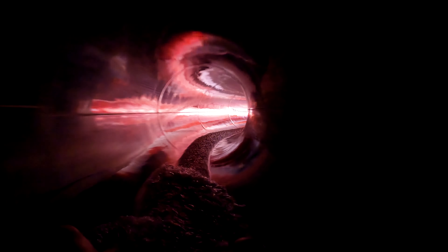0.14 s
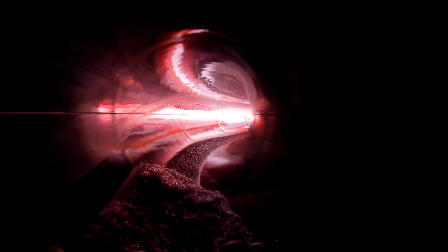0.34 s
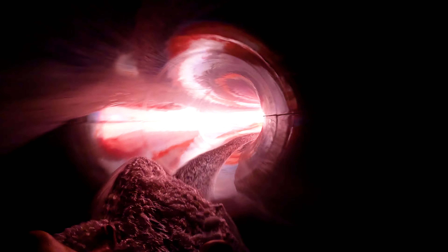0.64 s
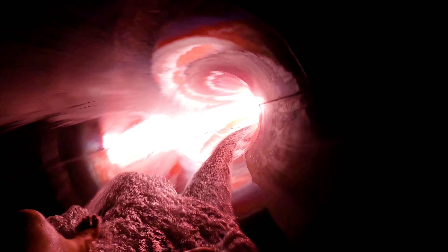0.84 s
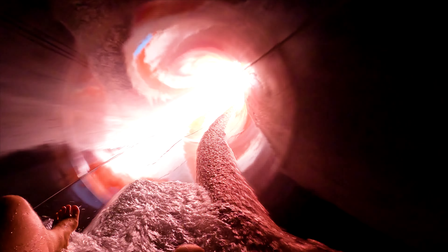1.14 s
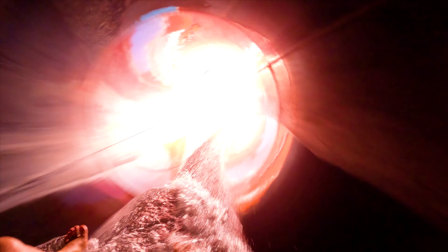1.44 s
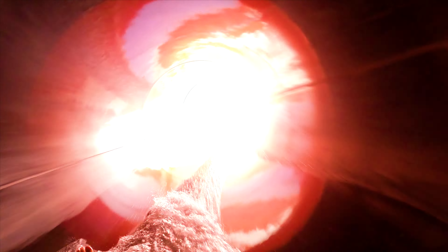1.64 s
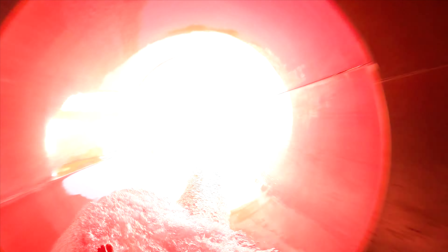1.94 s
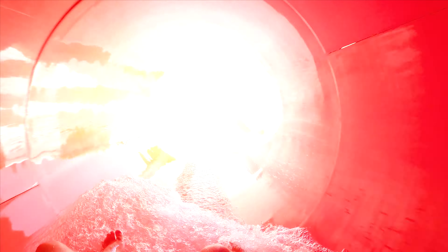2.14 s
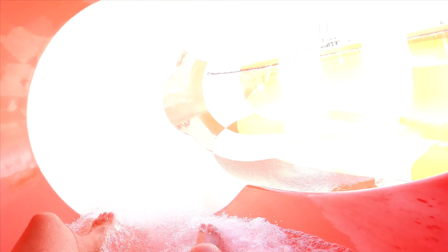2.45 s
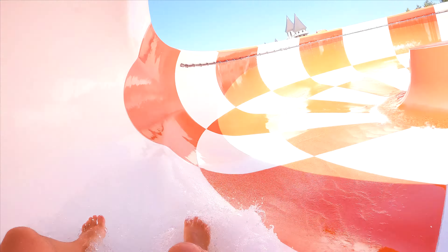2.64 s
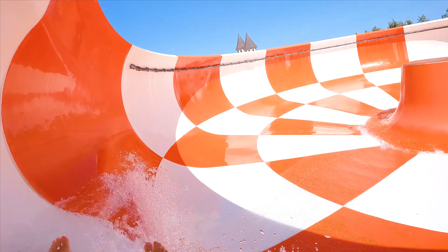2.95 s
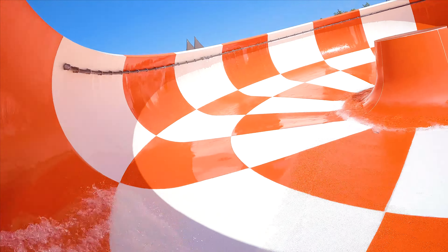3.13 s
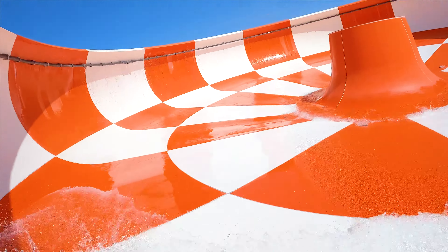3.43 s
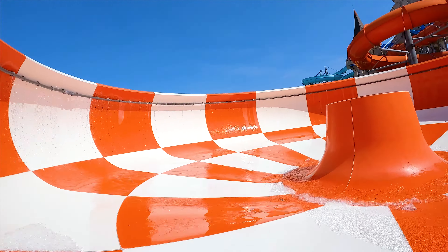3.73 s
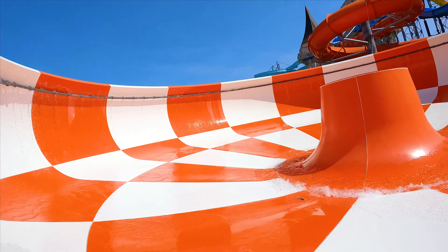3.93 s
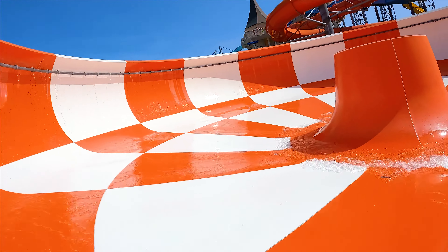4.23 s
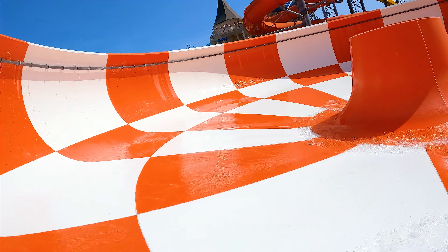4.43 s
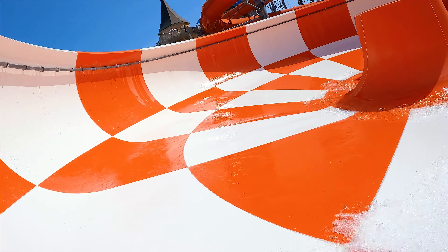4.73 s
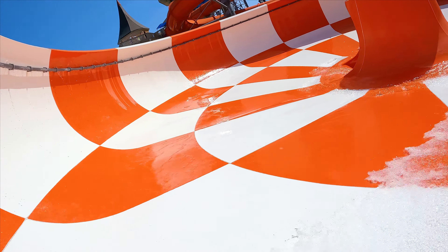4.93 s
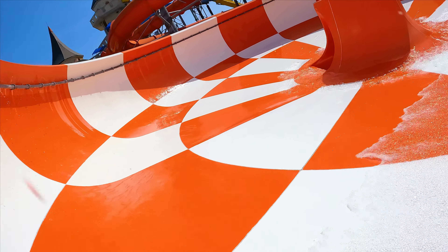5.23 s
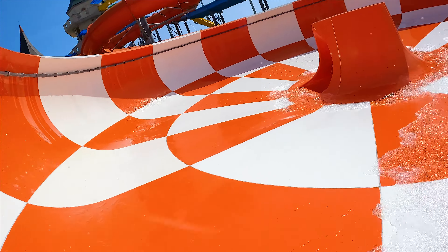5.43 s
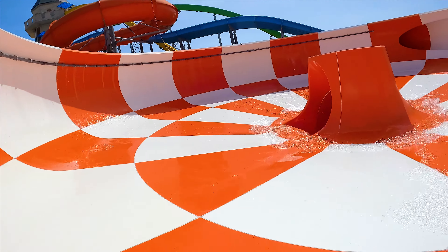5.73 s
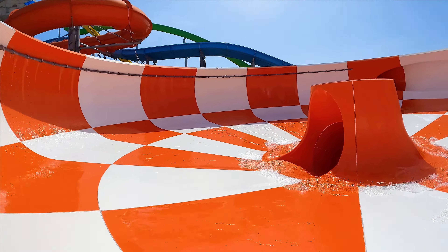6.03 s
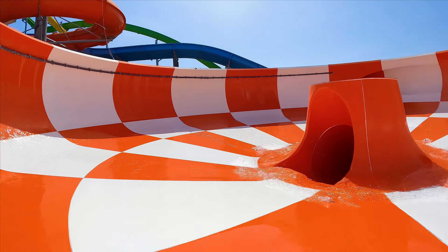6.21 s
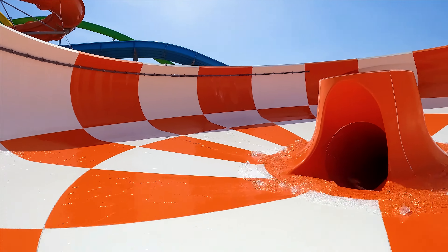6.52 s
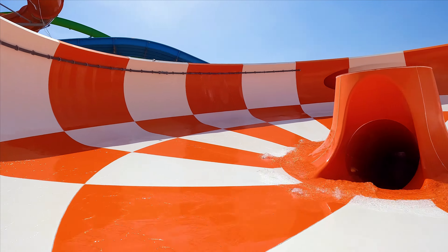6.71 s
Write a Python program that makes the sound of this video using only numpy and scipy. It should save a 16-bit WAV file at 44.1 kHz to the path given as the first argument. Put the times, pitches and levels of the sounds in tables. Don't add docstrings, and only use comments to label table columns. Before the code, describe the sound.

Close, muffled first-person sound of a water slide ride. Water roars steadily with a hollow, ringing hum in the tube, over deep wind buffeting, shuddering rumble and gulping air pockets. Around three seconds the space opens into an outdoor bowl; spray surges, the ringing fades and bumps grow harder. Later a faint high sizzle appears, and finally waves gurgle over the sealed microphone with quick slaps.

```python
import sys
import numpy as np
from scipy import signal
from scipy.fft import rfft, irfft, next_fast_len
from scipy.io import wavfile
from scipy.ndimage import uniform_filter1d, minimum_filter1d, map_coordinates

SR = 44100
rng = np.random.default_rng(int(sys.argv[2]) if len(sys.argv) > 2 else 0)


def inscribe(sig):
    pcm = np.round(np.clip(np.atleast_2d(sig).T, -1, 1) * 32767)
    wavfile.write(sys.argv[1], SR, pcm.astype(np.int16))


def undo_db(level):
    steps = np.asarray(level, float) / 20
    return 10 ** steps


N = 302967

# (frequency [Hz], density [dB per Hz])
CHURN_COLOUR = [(500, -60), (850, -6.5), (1050, -2.5), (1300, -8.5), (1700, -16), (2300, -27.5),
                (4500, -120)]
# (time [s], level [dB])
HULL_LOAD = [(0, -31), (.75, -31), (1.0, -31.5), (1.4, -29), (1.9, -36.5), (2.3, -30), (2.7, -26),
             (3.15, -26), (3.5, -25.5), (3.95, -29), (4.15, -25), (4.75, -27), (5.2, -31), (5.7, -24),
             (5.9, -25), (6.4, -27), (6.65, -19), (6.87, -21)]
RING_ATTACK_S, RING_T60_S = 0.02, 0.43


def unit(x):
    return x / np.sqrt(np.mean(x ** 2) + 1e-20)


def clock():
    return np.arange(N) / SR


def curve(rows):
    times, values = np.transpose(rows)
    return np.interp(clock(), times, values, left=-150, right=-150)


def wobble(rate):
    knots = rng.standard_normal(2000)
    return map_coordinates(knots, [np.arange(N) * rate / SR])


def swells(rows):
    t = clock()
    return sum(db * np.exp(-((t - s) / half) ** 2) for s, db, half in rows)


def spells(rows, attack_s, t60_s):
    t = clock()
    gain = np.zeros(N)
    for start, db, hold in rows:
        onset = np.clip((t - start) / attack_s + 0.5, 0, 1)
        decay_db = 60 * np.maximum(t - start - hold, 0) / t60_s
        gain += onset * undo_db(db - decay_db)
    return gain


def smoothed(x, size):
    return uniform_filter1d(uniform_filter1d(x, size=size), size=size)


def steadied(x, size, share):
    power = np.abs(smoothed(x ** 2, size))
    return unit(x / (power + 1e-3) ** share)


def filtered(x, response):
    m = next_fast_len(N + SR // 2)
    return irfft(rfft(x, m) * response(np.fft.rfftfreq(m, 1 / SR)), m)[:N]


def colour(points):
    f, v = np.transpose(points)
    return lambda hz: undo_db(np.interp(np.log(hz + 1), np.log(f + 1), v))


def resonance(f, hz, width):
    return f * width / (hz * hz - f * f + 1j * f * width)


def rush(response, patchy_db, spiky=0.0):
    drops = rng.standard_normal(N) * np.exp(spiky * rng.standard_normal(N))
    z = signal.stft(drops, nperseg=1024)[2]
    field = uniform_filter1d(rng.standard_normal(z.shape), size=8, axis=0)
    field = uniform_filter1d(field, size=6, axis=1)
    patchy = signal.istft(z * undo_db(patchy_db * unit(field)), nperseg=1024)[1][:N]
    return unit(filtered(patchy, response))


def knocks(events, gain_db, cycles, noisy):
    out = np.zeros(N + SR)
    t = np.arange(SR // 5) / SR
    for s, db, hz, t60 in events:
        puff = smoothed(rng.standard_normal(len(t)), int(SR / hz))
        shape = undo_db(-60 * t / t60) * (1 - np.exp(-t * hz / cycles)) ** 2
        ring = shape / shape.max() * np.sin(2 * np.pi * hz * t)
        out[round(s * SR):][:len(t)] += undo_db(db + gain_db) * (1 + noisy * unit(puff)) * ring
    return out[:N]


def opening():
    # (time [s], open share [0-1])
    open_share = [
        (0, 0.03),
        (2.2, 0.04),
        (2.9, 0.6),
        (3.6, 0.98),
        (6.87, 0.96),
    ]
    return np.clip(curve(open_share), 0, 1)


def flow():
    # (time [s], level [dB])
    flow_points = [(0, -24), (.25, -24), (.55, -24), (.95, -25), (1.3, -27), (1.7, -26.5), (2.05, -25),
                   (2.35, -23), (2.85, -21), (3.1, -20.5), (3.8, -26), (4.25, -26), (4.65, -21.5),
                   (5.2, -28.5), (5.6, -27.5), (6.0, -28.5), (6.4, -26.5), (6.87, -24.5)]
    db = curve(flow_points)
    return db, db - db.mean()


def waves():
    # (crest time [s], rise [dB], build-up [s])
    crests = [(.2, 3, 0.27), (.9, 1, 0.5), (1.53, 1.5, 0.075), (1.9, 3, 0.55), (2.42, 0, 0.074),
              (2.58, 1, 0.045), (3.15, -2.5, 0.3), (2.05, 0.5, .15), (3.18, 3.5, 0.034), (3.24, 3, 0.045),
              (3.3, 3, .06), (3.38, 7, 0.067), (3.44, 6, 0.053), (3.475, 0.5, .04), (3.63, 5.5, 0.034),
              (3.72, 1.5, 0.094), (4.13, -0.5, .05), (4.48, 1, 0.063), (4.75, -1.5, 0.11), (5.12, 0, .06),
              (5.67, -2, 0.14), (5.9, 2, .06), (6.2, 4, 0.3), (6.32, -0.5, 0.066)]
    t = clock()
    rise = np.zeros(N)
    for s, db, build in crests:
        span = np.where(t < s, build, 0.43 * build)
        rise += db * np.exp(-((t - s) / span) ** 2)
    return rise


def lurches():
    # (time [s], change [dB], half length [s])
    digs = [(.3, 0, .1), (0.616, 2, 0.043), (0.952, -9.5, 0.15), (1.2, 1, 0.056), (1.397, 3.5, 0.037),
            (1.576, -3, 0.056), (1.949, 7.5, 0.25), (2.2, 6, 0.049), (2.45, 1, 0.046), (3.005, -3, 0.053),
            (3.17, 1.5, 0.057), (3.563, 3.5, 0.16), (3.72, -1.5, 0.044), (3.87, 6, 0.039),
            (4.146, 7.5, 0.018), (4.31, -5.5, 0.023), (4.398, 6.5, 0.045), (4.603, -2.5, 0.04),
            (4.99, 1.5, 0.073), (5.197, -4.5, 0.024), (5.39, 5, 0.05), (5.62, -4, 0.025), (5.69, 1, 0.025),
            (5.93, 5, 0.028), (6.246, 1, 0.12), (6.6, 5, 0.031), (6.74, 1, 0.037), (6.86, -3.5, 0.029)]
    return swells(digs)


def port_film():
    # (time [s], level [dB])
    spread = [
        (4.0, -115),
        (4.08, -91),
        (4.35, -77.5),
        (4.7, -75.5),
        (4.9, -82.5),
        (5.1, -82),
        (5.3, -82),
        (5.42, -76),
        (5.85, -75),
        (6.22, -68),
    ]
    # (frequency [Hz], density [dB per Hz])
    port_colour = [(8000, -70.5), (11200, -40), (11800, -6.5), (12800, 0), (13600, -3), (14500, -14),
                   (15700, -13), (17000, -80.5)]
    t = clock()
    end_s, end_db = spread[-1]
    film_db = np.where(t < end_s, curve(spread), end_db)
    film_db = film_db - 85 * np.maximum(t - 6.5, 0)
    film_db = film_db - 900 * np.maximum(t - 6.63, 0)
    return undo_db(film_db + 1.2 * wobble(60)) * rush(colour(port_colour), patchy_db=1.5, spiky=0.6)


def port_pops():
    # (time [s], peak [dB])
    clicks = [(1.075, -70), (1.492, -71), (3.4294, -72), (4.1475, -69.5), (4.3236, -70), (5.1796, -73),
              (6.318, -73.5), (6.4707, -72), (6.561, -63), (6.5824, -55), (6.5986, -58.5), (6.6044, -52.5),
              (6.6253, -54), (6.6573, -65)]
    # (time [s], peak [dB], frequency [Hz], t60 [s])
    rings = [
        (4.7675, -68.5, 13450, 0.0045),
        (5.4028, -56, 13000, 0.0051),
        (5.456, -51, 12880, 0.0048),
        (5.5227, -55, 12800, 0.0034),
        (6.4838, -47, 12300, 0.004),
        (6.534, -55.5, 13650, 0.0066),
    ]
    sparks = np.zeros(N)
    for s, db in clicks:
        sparks[round(s * SR)] = undo_db(db + 11.5)
    click_colour = [(2500, -41.5), (6000, -3), (9000, 7.5), (12000, 4), (15500, -0.5), (16000, -58)]
    ticks = knocks(rings, gain_db=-5.5, cycles=4.5, noisy=0.8)
    ticks = filtered(ticks, lambda hz: np.clip(hz / 1000 - 10.5, 0, 1))
    return filtered(sparks, colour(click_colour)) + ticks


def splash(surge):
    # (time [s], change [dB], half length [s])
    jets = [
        (3.235, 3, .03),
        (3.29, 2, .025),
        (3.47, 2.5, .015),
        (3.52, -2, .02),
        (2.25, 1, .1),
        (4.95, 1.5, .06),
        (5.95, 1.5, .05),
    ]
    # (frequency [Hz], density [dB per Hz])
    spray_colour = [(800, -58.5), (1700, -7), (2300, -6.5), (3200, -9.5), (4200, -22.5), (6000, -47),
                    (10000, -120)]
    # (frequency [Hz], density [dB per Hz])
    mist_colour = [(2000, -60), (3800, -1.5), (5000, -6.5), (6300, -14), (8000, -25.5), (9500, -56),
                   (16000, -86)]
    swing_db, wave_db = flow()[1], waves()
    spray_db = -53 + 0.93 * swing_db + wave_db
    mist_db = -67 + 0.32 * swing_db + 0.94 * wave_db - 3 * opening()
    fizz_db = swells(jets) + 0.51 * surge + 0.4 * wobble(40)
    spray = undo_db(spray_db + fizz_db) * rush(colour(spray_colour), patchy_db=1.1, spiky=0.54)
    mist = undo_db(mist_db + fizz_db) * rush(colour(mist_colour), patchy_db=0.5, spiky=0.39)
    return spray + mist


def tube_hum():
    # (frequency [Hz], width [Hz])
    cross_mode = (296, 5.9)
    # (time [s], level [dB], hold [s])
    hum_spells = [(0, -26, 0.2), (0.396, -32.5, 0.31), (0.76, -30, .06), (0.85, -27, 0.047),
                  (0.98, -30, 0.12), (1.447, -26, 0.12), (1.76, -32.5, 0.095), (1.88, -35, 0.14),
                  (2.05, -30, 0.1), (2.2, -33, 0.096), (2.445, -38.5, 0.11)]
    hz, width = cross_mode
    mode = lambda f: resonance(f, hz, width) * (f < 2 * hz)
    hum = steadied(rush(mode, patchy_db=0.5), size=2401, share=0.3)
    return spells(hum_spells, RING_ATTACK_S, RING_T60_S) * hum


def upper_roar():
    # (frequency [Hz], width [Hz], level [dB])
    upper_modes = [
        (615, 56, 1),
        (830, 70, -3),
    ]
    # (time [s], level [dB], hold [s])
    upper_spells = [
        (0, -34, .1),
        (.22, -36, 0.074),
        (.45, -33, 0.23),
        (1.62, -33, 0.14),
        (2.2, -34.5, .1),
        (2.32, -29, 0.18),
        (2.56, -30, 0.34),
    ]

    def modes(f):
        total = sum(undo_db(db) * resonance(f, hz, width) for hz, width, db in upper_modes)
        return total * colour([(1000, 0), (1800, -50)])(f)

    return spells(upper_spells, RING_ATTACK_S, RING_T60_S) * rush(modes, patchy_db=2.0)


def gulps():
    # (time [s], peak [dB], frequency [Hz], t60 [s])
    slow_pockets = [(.078, -20, 568, 0.11), (.121, -16, 629, 0.049), (.418, -29, 676, 0.061),
                    (.47, -19, 671, 0.075), (.528, -17.5, 667, 0.11), (.655, -20.5, 804, 0.1),
                    (.774, -18.5, 601, 0.1), (.847, -16, 729, .08), (.941, -25.5, 685, 0.074),
                    (1.206, -25, 714, 0.068), (1.44, -14, 583, 0.097), (1.567, -19.5, 529, 0.05),
                    (1.776, -18.5, 568, 0.076), (1.85, -24.5, 680, .06), (2.049, -19.5, 825, .05),
                    (2.33, -19, 551, 0.18), (2.498, -22, 668, 0.071), (2.74, -18.5, 707, 0.18),
                    (2.79, -21.5, 511, 0.086), (2.975, -16.5, 498.5, 0.25), (3.046, -28, 636, 0.072),
                    (3.088, -20, 552, 0.16), (3.268, -22.5, 681, 0.11), (3.551, -26, 710, 0.037),
                    (4.034, -25, 832, 0.046), (4.117, -22.5, 620, 0.088), (4.215, -22.5, 512, .05),
                    (4.53, -20.5, 524, 0.085), (4.963, -22.5, 814, 0.063), (5.376, -24, 928, 0.1),
                    (5.518, -27, 640, 0.042), (5.66, -17, 564, 0.05), (5.755, -19.5, 417, 0.046),
                    (5.99, -29, 615, .05), (6.212, -23, 768, 0.038), (6.641, -18, 622, 0.086),
                    (6.818, -22, 716, .08), (1.69, -15, 638, 0.18), (2.58, -18, 831, 0.56),
                    (2.85, -21, 820, 0.058), (3.83, -16, 950, 0.079), (3.88, -11, 330, 0.039),
                    (4.87, -18, 776, 0.056), (4.13, -36, 1315, 0.057), (5.69, -13, 455, 0.029),
                    (6.312, -13.5, 601, 0.027), (6.72, -9, 468, 0.04)]
    # (time [s], peak [dB], frequency [Hz], t60 [s])
    quick_pockets = [(0.121, -18, 598, .04), (0.471, -19, 623, .05), (0.941, -29, 675, .05),
                     (2.848, -18, 570, .05), (3.046, -24, 640, .04), (3.268, -20, 690, .05),
                     (4.963, -29, 824, .05), (5.99, -23, 620, .04), (6.32, -20, 575, .04),
                     (1.94, -20, 940, .06), (2.08, -21.5, 956, .05), (2.23, -17, 880, .06),
                     (2.5, -26.5, 1070, .05), (2.19, -14, 286, .06), (4.128, -27.5, 1420, .03),
                     (4.0, -21, 980, .04), (4.09, -26, 820, .03)]
    slow = knocks(slow_pockets, gain_db=-4.5, cycles=3.7, noisy=0.83)
    quick = knocks(quick_pockets, gain_db=-2.5, cycles=0.98, noisy=0.16)
    slow = filtered(slow, colour([(1300, 0), (3000, -50.5)]))
    return slow + filtered(quick, colour([(1500, -0.5), (3000, -44)]))


def water(surge, bite_db):
    # (frequency [Hz], density [dB per Hz])
    tube_colour = [(240, -41.5), (430, -19.5), (490, -9), (560, -0.5), (730, -4), (830, -5), (1000, -12),
                   (1400, -47.5), (3000, -120)]
    # (frequency [Hz], density [dB per Hz])
    bowl_colour = [(240, -38), (400, -9), (560, -1), (850, -2.5), (1000, -8.5), (1400, -36.5), (3000, -120)]
    flow_db, swing_db = flow()
    open_air = opening()
    roar_db = flow_db + (-3 + 0.56 * bite_db) * open_air
    churn_db = -36 + 0.89 * swing_db + 0.74 * waves() + 0.6 * open_air * bite_db
    tube = np.sqrt(1 - open_air) * rush(colour(tube_colour), patchy_db=0.0, spiky=0.2)
    bowl = np.sqrt(open_air) * rush(colour(bowl_colour), patchy_db=0.65, spiky=0.64)
    roar = undo_db(roar_db - 0.4 + 0.7 * surge) * steadied(tube + bowl, size=501, share=0.11)
    churn = undo_db(churn_db + 0.15 * surge) * rush(colour(CHURN_COLOUR), patchy_db=1.02, spiky=0.41)
    return roar + churn


def hull_drone(surge, bite_db):
    # (frequency [Hz], density [dB per Hz])
    drone_colour = [(150, -120), (250, -10.5), (330, -5), (450, -7), (560, -13.5), (1000, -56.5),
                    (2000, -120)]
    # (time [s], change [dB], half length [s])
    hollows = [
        (.3, 0, .15),
        (.75, -3, .08),
        (.95, -8, 0.19),
        (1.3, 1, .08),
        (1.7, 3.5, 0.17),
        (2.15, -1.5, 0.13),
        (2.95, -4.5, 0.13),
        (4.95, 3, 0.16),
    ]
    load_db = curve(HULL_LOAD)
    drone_db = -31.5 + 0.4 * flow()[1] + 0.7 * (load_db - load_db.mean())
    drone_db = drone_db - 2 * opening() + bite_db + swells(hollows)
    return undo_db(drone_db) * unit(undo_db(0.34 * surge) * rush(colour(drone_colour), patchy_db=0.5))


def hull_rumble(surge, bite_db):
    # (frequency [Hz], density [dB per Hz])
    hull_colour = [(50, -120), (90, -6), (140, -1), (250, -4), (330, -10.5), (600, -48.5), (1200, -120)]
    # (frequency [Hz], gain [dB])
    bow_band = [(120, -38), (155, 1.5), (260, -4.5), (330, -38.5)]
    # (time [s], lost share [0-1], half length [s])
    lifts = [
        (2.7, 0.2, 0.088),
        (3.04, 0.7, 0.038),
        (3.2, .7, .12),
        (3.35, .5, .05),
    ]
    lumps = undo_db(0.44 * surge + 0.86 * wobble(25))
    shudder = unit(lumps * rush(colour(hull_colour), patchy_db=-1.0))
    hull = undo_db(curve(HULL_LOAD) + 0.55 * bite_db) * shudder
    return hull - np.clip(swells(lifts), 0, 1) * filtered(hull, colour(bow_band))


def seam_bumps():
    # (time [s], peak [dB], frequency [Hz], t60 [s])
    bumps = [(0.619, -15, 130, 0.049), (0.847, -21, 282, 0.054), (1.389, -16, 146, 0.12),
             (2.599, -15, 150, 0.13), (.84, -16, 173, 0.12), (1.133, -29, 135, 0.1),
             (1.18, -18, 229, 0.077), (3.885, -19, 285, 0.054), (4.14, -18, 260, .05), (6.8, -12, 207, .05),
             (1.704, -19, 127, .08), (2.46, -18, 312, 0.092), (2.55, -20, 328, 0.086),
             (2.635, -20.5, 290, 0.14), (2.735, -19.5, 216, .05), (3.0, -12.5, 128, 0.093),
             (3.1, -16, 111, .09), (3.3, -14.5, 228, 0.14), (3.375, -18.5, 202, .06),
             (3.465, -10, 160, 0.06), (3.59, -17, 130, 0.063), (3.969, -17, 163, 0.093),
             (4.335, -18, 137, 0.076), (4.43, -14.5, 225, 0.065), (5.224, -21, 187, 0.097),
             (5.352, -19, 165, 0.039), (5.54, -17, 332, 0.062), (5.98, -19.5, 304, .06),
             (6.44, -19.5, 233, 0.063), (3.43, -12.5, 198, 0.052), (3.525, -11.5, 155, 0.058),
             (3.793, -12, 169, 0.11), (3.884, -17, 134, 0.098), (4.15, -4.5, 166, 0.074),
             (4.389, -14.5, 225, 0.07), (4.671, -10, 148.6, 0.055), (4.797, -15.5, 339, 0.09),
             (4.894, -16.5, 150, 0.077), (5.049, -23, 139, 0.07), (5.397, -29, 288, 0.07),
             (5.667, -18, 200, 0.065), (5.918, -26, 180, 0.065), (6.212, -17, 207, 0.034),
             (6.318, -14, 377, 0.06), (6.6, -10.5, 193, 0.03), (6.63, -11.5, 297, 0.036),
             (6.72, -9, 211, 0.088)]
    thumps = knocks(bumps, gain_db=-1.5, cycles=0.59, noisy=0.25)
    return filtered(thumps, colour([(700, -1.0), (2000, -58.5)]))


def housing_pour():
    # (time [s], level [dB], hold [s])
    pours = [
        (6.59, -31, .025),
        (6.64, -29, .095),
        (6.762, -35, .02),
        (6.79, -34, .03),
        (6.835, -34, .04),
    ]
    # (frequency [Hz], density [dB per Hz])
    wash_colour = [(600, -30), (1000, 1), (1500, 0), (1900, -6), (2300, -24), (3300, -32), (5000, -58),
                   (9000, -120)]
    pour = spells(pours, attack_s=0.01, t60_s=0.12)
    wash = steadied(rush(colour(wash_colour), patchy_db=0.5, spiky=0.7), size=401, share=0.2)
    gurgle = unit(undo_db(2 * wobble(90)) * wash)
    slosh = unit(undo_db(1.8 * wobble(60)) * rush(colour(CHURN_COLOUR), patchy_db=1.2, spiky=0.6))
    return pour * (gurgle + undo_db(-6) * slosh)


def housing_drops():
    # (time [s], peak [dB], frequency [Hz], t60 [s])
    slaps = [(6.5925, -17, 1750, 0.02), (6.606, -17, 2230, 0.018), (6.608, -27, 2900, .008),
             (6.633, -19, 1850, .014), (6.651, -21, 2200, 0.008), (6.6705, -14, 2200, .007),
             (6.671, -23, 2750, .005), (6.6885, -19, 2500, 0.009), (6.689, -28, 3100, .007),
             (6.689, -39, 4300, .009), (6.645, -27, 2300, .006), (6.66, -28, 2100, .006),
             (6.681, -28, 2100, .006), (6.699, -28, 2500, .005), (6.712, -25.5, 2300, .006),
             (6.727, -27, 2300, 0.0062), (6.770, -15, 1670, .014), (6.771, -26, 2400, .006),
             (6.8015, -13, 2050, 0.009), (6.802, -24, 2750, .006), (6.802, -36, 3600, .005),
             (6.820, -28, 2200, 0.008), (6.837, -17, 1900, .012), (6.849, -26, 2000, .007)]
    # (time [s], peak [dB], frequency [Hz], t60 [s])
    ticks = [(2.5447, -46, 5370, 0.003), (2.5449, -40, 7200, .003), (3.0989, -50, 4500, 0.008),
             (3.176, -53, 5550, .01), (5.085, -38, 2950, 0.022), (5.596, -45, 5350, .006),
             (5.6015, -46, 5650, .006), (5.645, -48, 5600, .006), (5.6396, -43, 5100, 0.006),
             (5.6398, -48, 7500, .003), (6.430, -60, 5970, 0.0098), (6.6262, -42, 3900, .002),
             (6.6262, -50, 5500, .002), (5.6405, -46, 3900, .005), (5.32, -48, 4000, .004)]
    # (frequency [Hz], gain [dB])
    muffling = [(5000, -3), (7000, -16), (10000, -40)]
    hits = knocks(slaps, gain_db=-7, cycles=1.2, noisy=0.2)
    hits = hits + knocks(ticks, gain_db=-2.5, cycles=1.5, noisy=0.25)
    return filtered(hits, colour(muffling))


def air_buffet():
    # (time [s], level [dB])
    stream = [(0, -18.5), (.45, -19.5), (.85, -20), (1.3, -16.5), (1.7, -22.5), (2.1, -20), (2.35, -18),
              (2.6, -20), (3.0, -17.5), (3.5, -21), (4.2, -20), (4.45, -20.5), (4.95, -19.5), (5.3, -25.5),
              (5.65, -21), (5.95, -21.5), (6.35, -18), (6.87, -18)]
    # (time [s], change [dB], half length [s])
    gusts = [(.11, 2, 0.041), (.6, 6.5, 0.031), (1.07, -4.5, 0.028), (1.17, 1, 0.043), (1.72, 5, 0.068),
             (1.9, 2, .04), (2.14, -5, .04), (2.24, 3, 0.051), (2.43, 0.5, .03), (2.56, -4, 0.034),
             (2.73, -1, .04), (3.03, 3, .03), (3.15, -2, 0.075), (3.7, 0, 0.035), (4.08, 0.5, 0.069),
             (4.23, -6, .04), (4.4, 8.5, 0.045), (4.83, 0.5, 0.034), (4.92, 8, 0.02), (5.0, -0.5, 0.046),
             (5.18, 1, 0.036), (5.38, -2, 0.044), (5.46, 3.5, 0.027), (5.69, 4.5, .05), (5.85, -4, 0.067),
             (6.18, -2, .03), (6.27, 1, 0.027), (6.43, -1.5, 0.027), (6.57, -3, .04), (6.74, -0.5, 0.054)]
    # (frequency [Hz], density [dB per Hz])
    buffet_colour = [(1, -28), (4, -6.5), (12, 0.5), (35, 0.5), (70, -1), (110, -5.5), (170, -20),
                     (300, -38), (600, -120)]
    turbulence = rush(colour(buffet_colour), patchy_db=-3.5)
    return undo_db(curve(stream) + swells(gusts)) * steadied(turbulence, size=1801, share=0.35)


def scene():
    surge, bite_db = wobble(14), lurches()
    mix = port_film() + port_pops() + splash(surge)
    mix = mix + tube_hum() + upper_roar() + gulps() + water(surge, bite_db)
    mix = mix + hull_drone(surge, bite_db) + hull_rumble(surge, bite_db) + seam_bumps()
    mix = mix + housing_pour() + housing_drops() + air_buffet()
    return mix[None]


def band_limit(x):
    return signal.sosfilt(signal.butter(12, 15720, fs=SR, output="sos"), x)


def record(dry):
    need = np.minimum(1, undo_db(-6.6) / (np.abs(dry) + 1e-9))
    held = minimum_filter1d(need, size=1301)
    return band_limit(dry * smoothed(held, 601))


dry = scene()
out = record(dry)
inscribe(out)
```